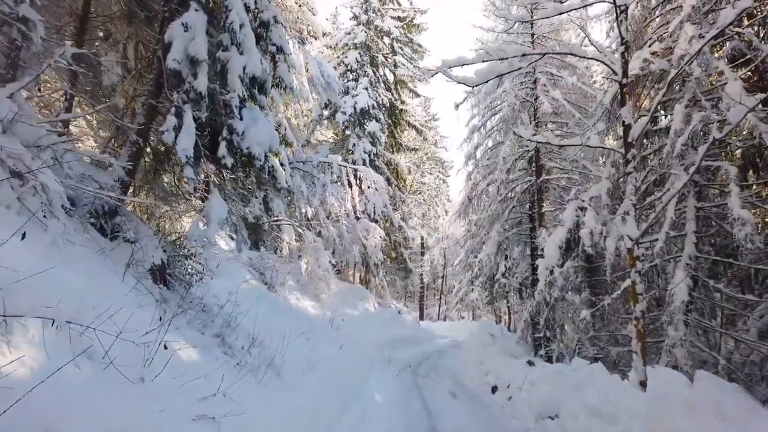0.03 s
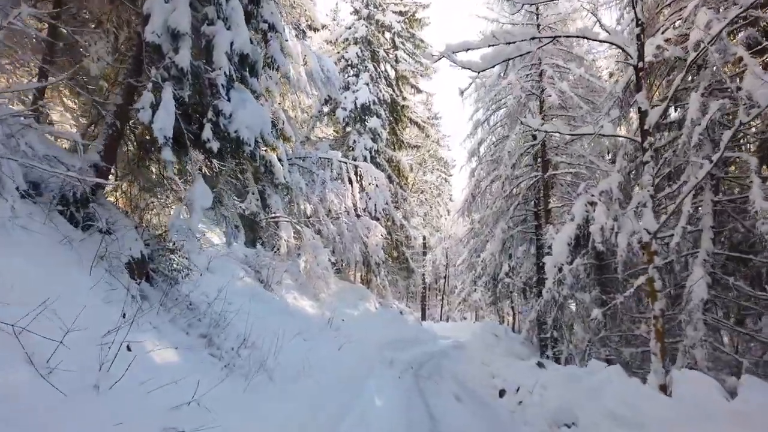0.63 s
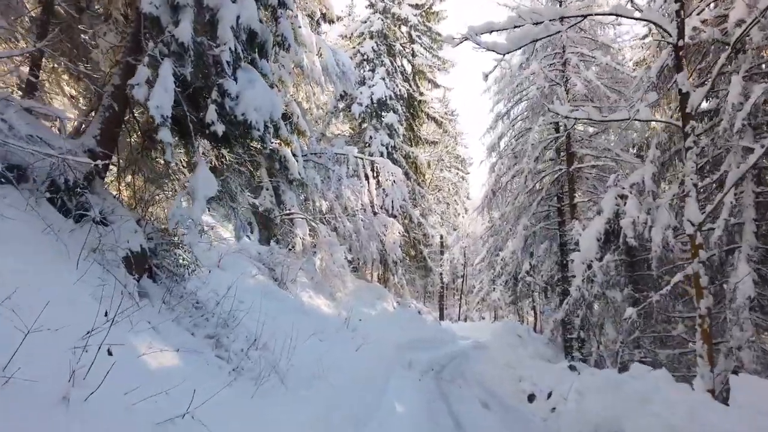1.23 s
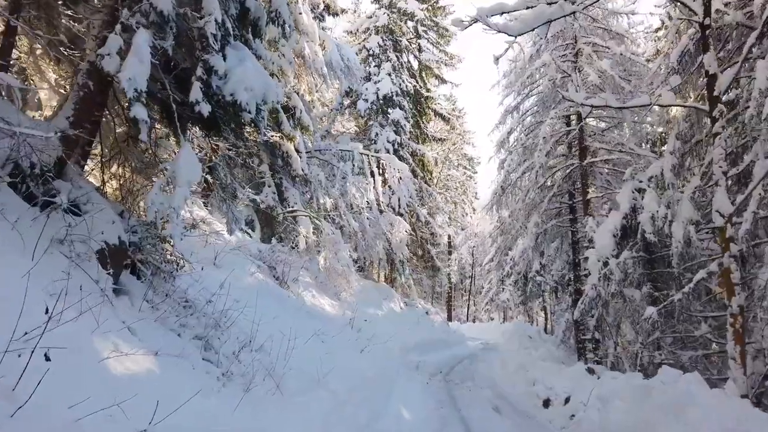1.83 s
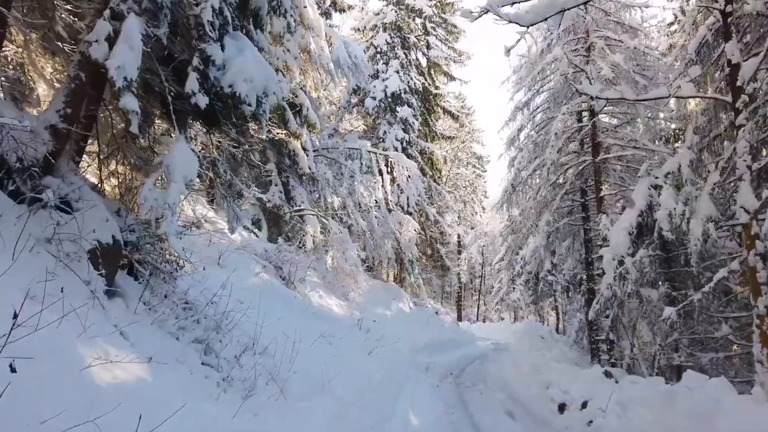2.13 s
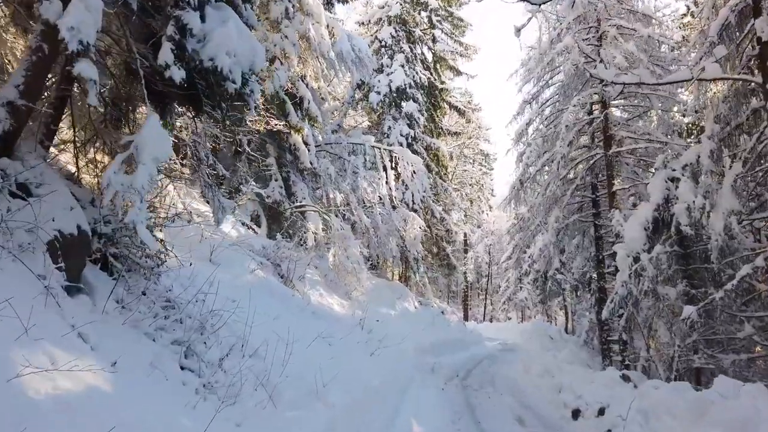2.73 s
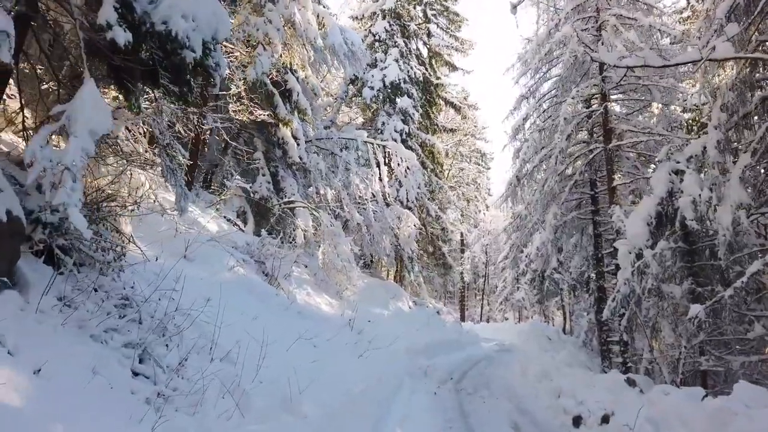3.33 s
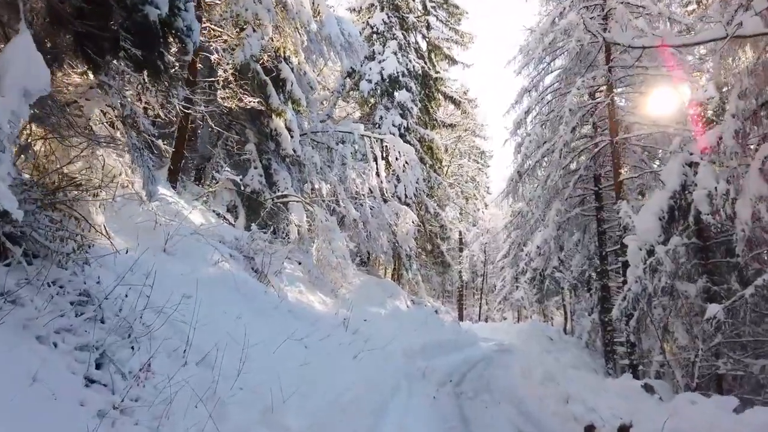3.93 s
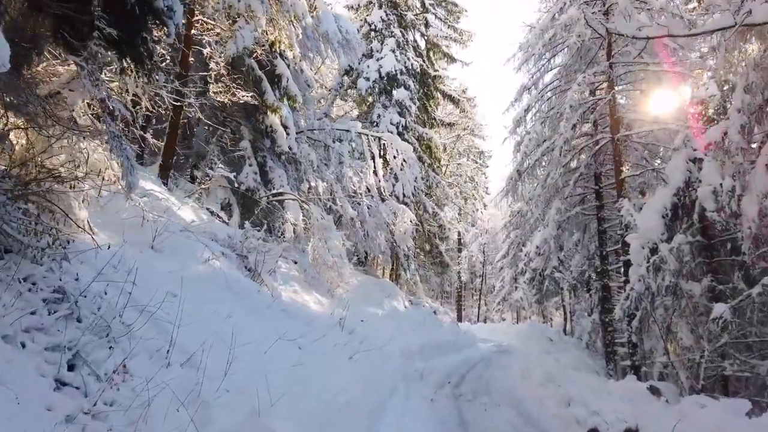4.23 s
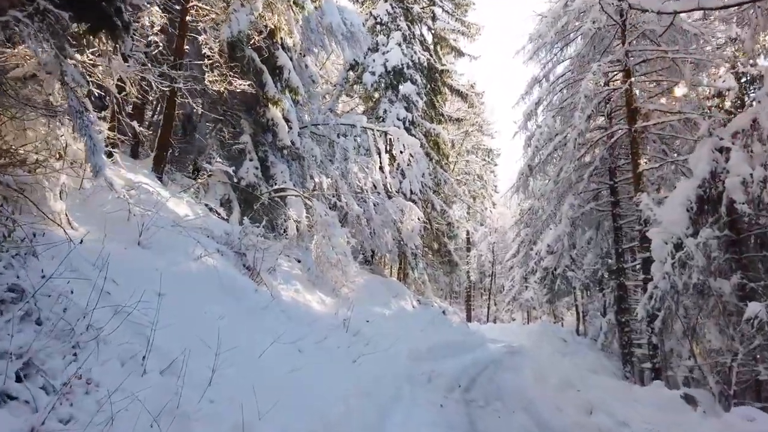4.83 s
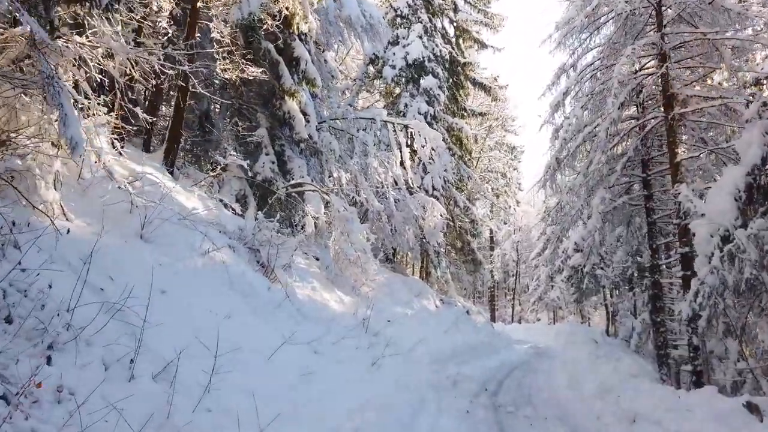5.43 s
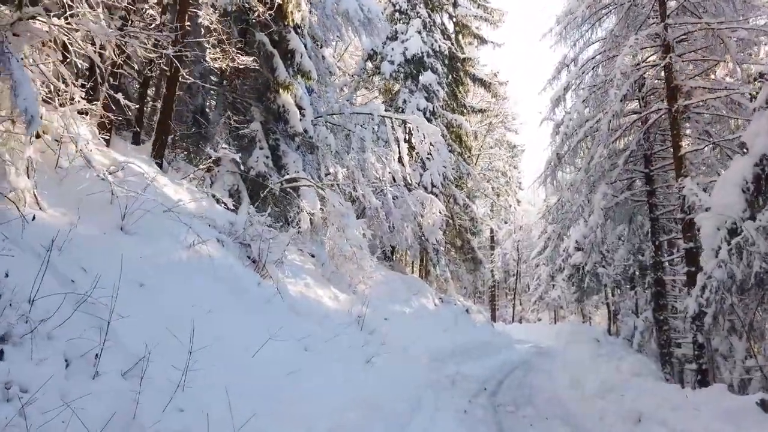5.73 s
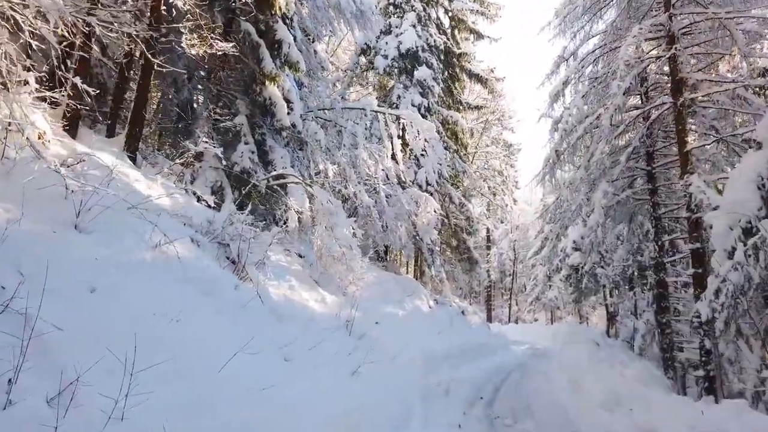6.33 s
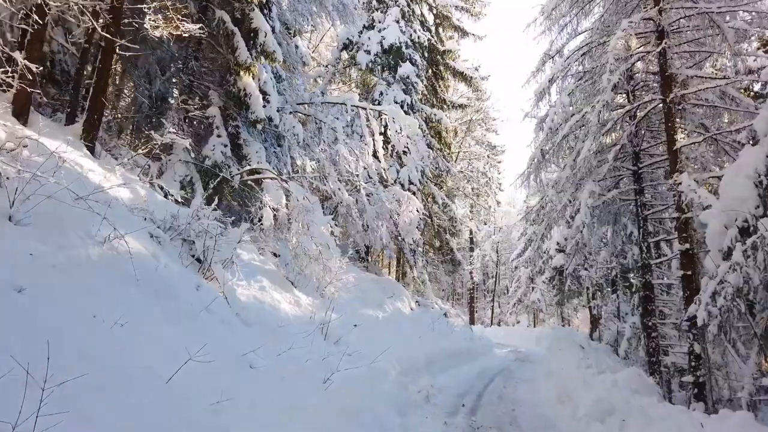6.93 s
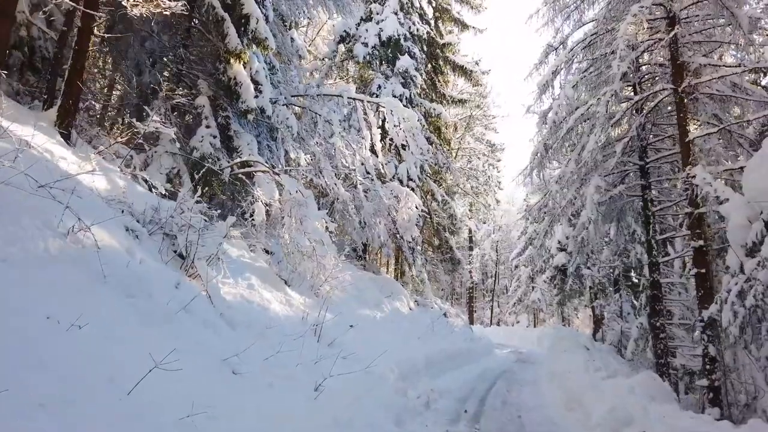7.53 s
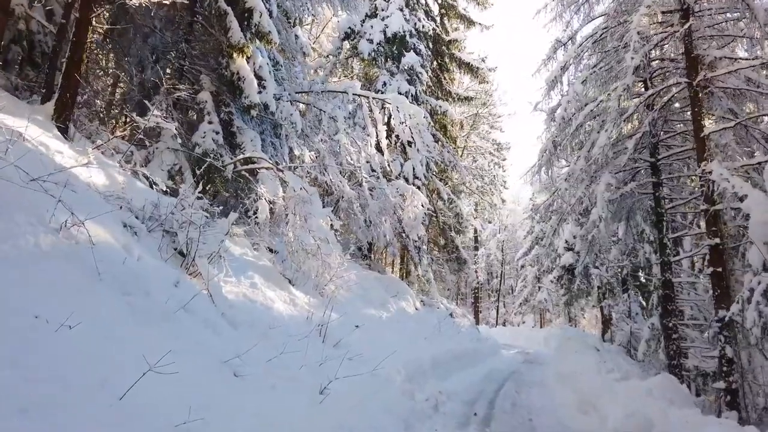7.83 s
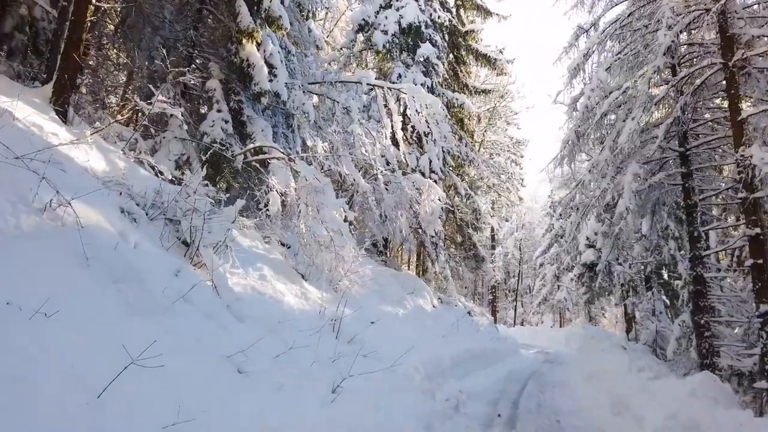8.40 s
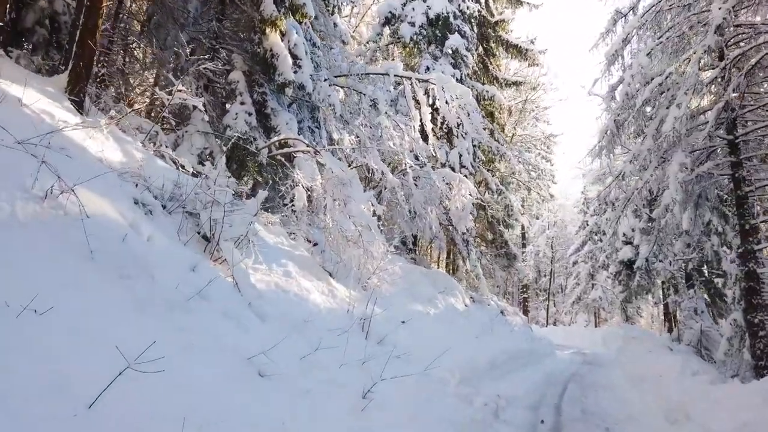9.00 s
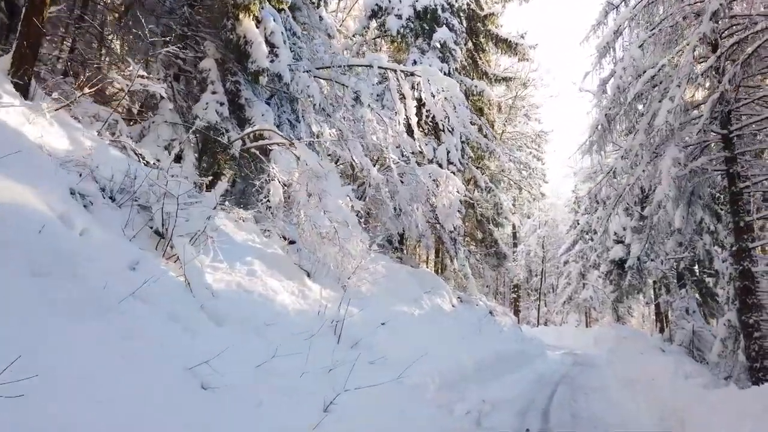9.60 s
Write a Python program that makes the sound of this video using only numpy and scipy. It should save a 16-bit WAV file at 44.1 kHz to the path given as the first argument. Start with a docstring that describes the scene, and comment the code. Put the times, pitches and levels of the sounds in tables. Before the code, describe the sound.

Close, dry footsteps crunch through snow at an unhurried, even pace, heard from a microphone in the walker's hand. They start softly, grow more crackly as the crust breaks, peak a little past halfway, then turn lighter. Powder hisses and packed snow creaks briefly underfoot, and a sleeve swishes once late on. Soft puffs of air and a thin sizzle of fingers touch the microphone over a faint forest hush.

```python
"""A snowy forest path, nearly silent. Someone walks it, phone in hand, about three steps in two seconds.
Under each boot the snow packs in a run of dull little fractures, cracks louder where the crust gives way
and creaks where it shears. Loose powder hisses and a nylon sleeve brushes once.
Fingers rubbing the phone make its microphone ports sizzle, and air buffets them."""
import sys
import numpy as np
from scipy import signal
from scipy.fft import rfft, irfft
from scipy.io import wavfile
from scipy.ndimage import uniform_filter1d

SR = 44100
rng = np.random.default_rng(int(sys.argv[2]) if len(sys.argv) > 2 else 0)


def int16_out(signal):
    """Quantize to a 16-bit WAV file."""
    q = np.round(np.clip(np.atleast_2d(signal).T, -1, 1) * 32767)
    wavfile.write(sys.argv[1], SR, q.astype(np.int16))


N = 426006
TIME = np.arange(N) / SR

# footfalls: (time [s], sink time [s], crunch [dB], packing [dB], hiss [dB], settling [dB], air jolt [dB])
STEPS = [(0.53, .13, -48, -58, -63.5, -60, -47.5), (1.145, 0.14, -47, -66, -62, -69, -71),
         (1.852, 0.15, -46.5, -64, -57, -61.5, -47.5), (2.45, 0.15, -44, -52.5, -57, -66.5, -60),
         (3.116, 0.11, -41, -51, -56, -60.5, -54), (3.725, .12, -43, -51.5, -53.5, -66, -42),
         (4.39, .13, -43, -44, -54, -52.5, -48.5), (5.06, .16, -49.5, -63, -53.5, -66.5, -53.5),
         (5.718, 0.11, -42, -47.5, -53.5, -56, -51), (6.222, .23, -47, -55, -59.5, -69, -46.5),
         (7.035, .10, -46, -61, -55.5, -64.5, -52.5), (7.688, .08, -49.5, -50, -51.5, -60.5, -68.5),
         (8.318, .13, -50.5, -53, -62, -64.5, -49), (8.865, .075, -42, -53, -55.5, -62.5, -67),
         (9.62, 0.15, -46, -49.5, -53.5, -61.5, -46.5)]


def gait(blend_s=0.18, settle_deep_db=-9, trickle_db=-73, breeze_db=-63.5):
    """Levels [dB] of crunch, deep packing, powder hiss and buffeting along the walk."""
    # footfall envelopes: (20 dB attack [s], sag [dB/s], mid-sink swell [dB], 20 dB release [s])
    crunch_shape = (0.036, 21.4, 1.7, 0.07)
    packing_shape = (0.043, 21, 0.68, 0.1)
    hiss_shape = (0.0665, -9, 3.5, 0.1238)
    jolt_shape = (0.35, 0, 7, 0.34)
    # boot drags or rolls off: (centre [s], length [s], crunch [dB], packing [dB], hiss [dB])
    scuffs = [(0.013, .07, -68, -82, -64.5), (0.215, .1, -72, -78, -69), (0.382, .05, -69, -50.5, -81),
              (0.861, .12, -62, -71.5, -68), (1.298, 0.078, -64, -83, -54.5),
              (1.716, 0.041, -76, -70, -77.5), (3.305, 0.16, -55.5, -62, -73),
              (3.68, 0.1289, -55, -68, -59.5), (4.208, 0.11, -57, -53, -92),
              (4.304, 0.06, -46.5, -42.5, -57), (4.399, .05, -50, -42, -67), (5.019, 0.2, -58, -78, -59.5),
              (5.631, 0.11, -55, -53, -60), (6.481, 0.0501, -54, -62, -57), (7.027, .03, -56, -48, -56.5),
              (7.333, 0.056, -65, -53, -71), (7.944, 0.075, -58, -51, -67), (8.44, .09, -56, -66, -56.5),
              (8.81, .12, -54, -76, -66), (9.083, 0.28, -51.5, -57.5, -61.5)]
    # air over the ports: (centre [s], length [s], level [dB])
    gusts = [(0.0, 0.091, -45), (1.72, 0.12, -39), (2.78, 0.074, -46.5), (3.28, 0.048, -48),
             (4.11, 0.13, -46), (6.1, 0.24, -40.5), (7.51, 0.12, -44.5), (7.97, .06, -45),
             (8.54, 0.16, -45.5), (8.69, 0.064, -41), (9.07, 0.15, -46.5), (9.27, .1, -47.5)]
    step_s, _, crunch_db, packing_db, hiss_db, settle_db, jolt_db = np.transpose(STEPS)
    standing = np.searchsorted(step_s, TIME) - 1  # this foot packs the snow until the next lands
    standing_db = np.where(standing < 0, np.median(settle_db), settle_db[standing])
    settling = undb(uniform_filter1d(standing_db, int(blend_s * SR)) + 0.96 * wander(18))
    trickle = undb(trickle_db + 2.0 * wander(6))
    breeze = undb(breeze_db + 2.5 * wander(5.3))
    scuff_crunch, scuff_packing, scuff_hiss = (swells(np.array(scuffs)[:, [0, 1, k]]) for k in (2, 3, 4))
    return (sum_db(footfalls(crunch_db, crunch_shape), scuff_crunch, settling),
            sum_db(footfalls(packing_db, packing_shape), scuff_packing, settling * undb(settle_deep_db)),
            sum_db(footfalls(hiss_db, hiss_shape), scuff_hiss, trickle),
            sum_db(footfalls(jolt_db, jolt_shape), swells(gusts), breeze))


def footfalls(levels_db, shape):
    """Gain of all steps: the boot bites, presses as it sinks, comes to rest."""
    attack_s, sag_db_per_s, swell_db, release_s = shape
    out = np.zeros(N)
    for (at_s, sink_s, *_), db in zip(STEPS, levels_db):
        span = between(at_s - 2 * attack_s, at_s + sink_s + 2 * release_s)
        t = TIME[span] - at_s
        depth = np.clip(t / sink_s, 0, 1)
        fade = np.maximum(-t / attack_s, 0) + np.maximum((t - sink_s) / release_s, 0)
        press_db = swell_db * (np.sin(np.pi * depth) - 2 / np.pi) - sag_db_per_s * sink_s * depth
        out[span] += undb(db + press_db - 20 * fade)
    return out


def crunch(crunch_db, packing_db, grain_q=2.35, lump_db=2.0):
    """Snow packs in jerks, each clump at its own pitch; a harder push makes more of them."""
    # top snow and deeper layers: (frequency [Hz], density [dB])
    top_spectrum = [(120, -17), (300, -3.5), (500, 1.5), (780, 1), (1100, 0), (1600, -6), (2500, -10),
                    (4000, -9.5), (8000, -38.5)]
    deep_spectrum = [(50, -11.5), (110, 3.5), (200, 3.5), (330, 3), (550, -25.5), (1200, -57.5)]
    slips_per_s = 220 * undb(0.14 * (crunch_db + 50.5))
    clumps = sum(unit(band(slips(slips_per_s, scatter_db=4.0), hz, grain_q)) * np.sqrt(hz)
                 for hz in np.geomspace(280, 3000, 8))
    load = np.clip((crunch_db + 81) / 20, .2, 1)
    lumps = undb(lump_db * load * wander(130))  # a loaded sole sinks unevenly
    top = even_out(colour(clumps * lumps, top_spectrum), span_s=0.15)
    deep = even_out(colour(slips(3 * slips_per_s, scatter_db=8.0), deep_spectrum), span_s=0.13)
    return top * undb(crunch_db) + deep * undb(packing_db)


def crust(crunch_db, snap_hz=1700, whump_hz=200, delay_s=0.002583, sink_s=0.0023,
          before_db=-10, before_s=0.0028, after_s=0.0045):
    """Crust breaks: a dull thud, a snap above, a whump below; a few crumbs before, more after."""
    # single fractures: (time [s], peak [dB], pitch [Hz], snap re thud [dB])
    loud_cracks = [(0.391, -36.5, 433, -27), (0.621, -29, 758, -18), (0.667, -37.5, 488, -18),
                   (1.14, -36, 504, -4), (1.394, -39.5, 501, -23.5), (1.561, -43, 391, -16),
                   (1.847, -37, 463.4, -25), (2.165, -44, 406, -23.5), (2.446, -24.5, 539, -9),
                   (2.475, -30.5, 876, -12), (2.516, -24, 920, -12), (2.535, -35, 600, -20),
                   (3.005, -32, 684, -6), (3.115, -28, 552.6, -24.5), (3.17, -24.5, 739, -13.5),
                   (3.189, -21.5, 595.4, -1), (3.26, -29.5, 895, -27), (3.301, -31.5, 885, -27),
                   (3.372, -30, 891, -2), (3.382, -32.5, 824, -3.5), (3.507, -31.5, 934, -25.5),
                   (3.588, -27, 1110, -1), (3.626, -32.5, 930, -22), (4.02, -37.5, 771, -21),
                   (4.153, -41.5, 519, -12.5), (4.289, -20, 732, 1.5), (4.31, -27, 431, -25),
                   (4.378, -27.5, 416, -2), (4.411, -26.5, 470, -21), (4.459, -18, 779, -30),
                   (4.486, -21.5, 890, -29.5), (4.525, -19, 738, -20), (4.558, -19, 889, -34),
                   (4.639, -17, 840, -24.5), (4.735, -28.5, 570, -20.5), (4.773, -34, 662, -13.5),
                   (4.822, -30.5, 803, -23), (4.874, -24, 1050, -8), (4.933, -28, 642, -18),
                   (4.942, -27.5, 950, -19), (5.088, -31, 592, -4), (5.146, -28, 693, -1.5),
                   (5.241, -30.5, 548, 2), (5.466, -40, 1000, -14), (5.596, -31.5, 684, -8),
                   (5.629, -29.5, 506, -4), (5.725, -18.5, 618, -9), (5.749, -22.5, 750, -16),
                   (5.771, -15, 752, -10), (5.817, -11.5, 1000, -16), (5.958, -28.5, 575, -6),
                   (6.22, -5.5, 773, -18.5), (6.254, -14, 780, -18), (6.338, -10.5, 880, -7.5),
                   (6.393, -26.5, 870, -11.5), (6.432, -29, 823, -27), (6.499, -34.5, 420, -11.5),
                   (7.027, -31, 607, -8), (7.058, -20.5, 870, -2), (7.07, -26.5, 910, -15),
                   (7.157, -25.5, 1024, -9), (7.329, -40.5, 417, -3.5), (7.453, -32.5, 1747, -19.5),
                   (7.708, -21, 863, -8), (7.734, -27.5, 843, -23.5), (7.78, -32, 625, -22),
                   (7.925, -39, 380, -6), (8.278, -26.5, 420, 2.5), (8.379, -30.5, 859, -17),
                   (8.711, -37, 633, 5), (9.166, -31.5, 800, -28.5), (9.179, -33.5, 690, -28),
                   (9.541, -36, 401, -7), (9.617, -30.5, 402, -20)]
    cracks = list(loud_cracks) + small_cracks(crunch_db)
    lead = SR // 100
    out = np.zeros(N + SR)
    t = np.arange(-lead, SR // 25) / SR
    draws = rng.standard_normal((len(cracks), len(t)))
    loosening = np.where(t < 0, undb(before_db) * np.exp(t / before_s), np.exp(-t / after_s))
    for (at_s, db, hz, snap_db), draw in zip(cracks, draws):
        crumble_db = -9.5 - 0.27 * max(db + 30, -10)  # louder cracks break more cleanly
        whump_db = -20.5 - 16.5 * np.log2(hz / 700)  # lower cracks reach deeper
        snap = thud(t - delay_s, snap_hz * np.exp(0.17 * draw[0]), cycles=1.12)
        pulse = thud(t - delay_s, hz, cycles=1.17) + undb(snap_db) * snap
        whump = thud(t - delay_s - sink_s, whump_hz, cycles=1.54)  # the layer beneath sinks later
        pieces = draw * (np.abs(draw) > 2)  # only a few let go
        crumbs = pieces * loosening * np.minimum(np.abs(t) * hz / 2, 1)
        crumble = signal.fftconvolve(pulse, crumbs)[lead:lead + len(t)]
        start = int(at_s * SR)
        for part, relative_db in (pulse, 0), (whump, whump_db), (crumble, crumble_db):
            out[start:start + len(t)] += undb(db + relative_db) * part / np.abs(part).max()
    return out[lead:lead + N]


def small_cracks(crunch_db, count=70, above_crunch_db=10, scatter_db=2, median_hz=650, snap_db=-13.5):
    """Rows for crust(): weak random fractures, denser and stronger under load."""
    load = np.cumsum(undb(crunch_db))
    at = np.searchsorted(load, (np.arange(count) + rng.random(count)) * load[-1] / count)
    size, pitch = rng.standard_normal((count, 2)).T
    peak_db = crunch_db[at] + above_crunch_db + scatter_db * size
    pitch_hz = median_hz * np.exp(0.21 * pitch)
    return list(zip(at / SR, peak_db, pitch_hz, np.full(count, snap_db)))


def creaks(slip_hz=330, jitter=0.34, ring_q=2.16):
    """Cold snow sticks and slips in a quick, uneven run that rings the packed layer."""
    # shearing under the sole: (centre [s], length [s], level [dB], pitch [Hz])
    shears = [(0.37, 0.068, -52, 640), (0.544, 0.032, -48.5, 810), (0.639, 0.023, -44, 801),
              (1.175, 0.031, -58, 940), (2.575, 0.026, -44, 636), (2.984, 0.04, -56, 890),
              (6.02, 0.15, -53.5, 881), (6.783, 0.027, -50.5, 755), (7.066, 0.04, -39, 892),
              (7.689, 0.036, -43, 727), (7.968, 0.043, -51.5, 434), (9.143, 0.023, -47.5, 636),
              (9.654, 0.027, -37, 570)]
    out = np.zeros(N)
    t = np.arange(-SR // 10, SR // 10) / SR
    for at_s, length_s, db, hz in shears:
        slip_s = t[0] + np.cumsum(np.exp(jitter * rng.standard_normal(150))) / slip_hz
        pulses = np.histogram(slip_s, len(t), (t[0], t[-1]))[0]
        ring = unit(band(band(pulses, hz, ring_q), hz, ring_q / 2))
        envelope = undb(db) * np.exp(-(2 * t / length_s) ** 2)
        out += np.interp(TIME, at_s + t, ring * envelope, left=0, right=0)
    return out


def leg_echoes(x, echo_db=-15, decay_s=0.0083):
    """Legs and coat return soft echoes within milliseconds, different at each port."""
    t = np.arange(SR // 20) / SR
    echoes = rng.standard_normal((2, len(t))) * np.exp(-t / decay_s) * (t > .003)
    echoes /= np.linalg.norm(echoes, axis=1, keepdims=True)
    return undb(echo_db) * signal.fftconvolve(x[None], echoes)[:, :N]


def powder(hiss_db, flicker_db=1.0, direct_db=1.5, scattered_db=2.5):
    """Fine crystals rub on boot and trouser leg; the hiss arrives direct and scattered."""
    # powder friction: (frequency [Hz], density [dB])
    spectrum = [(500, 8.5), (1500, 9.5), (2600, 6), (4000, 2), (6000, 0), (8500, -3), (11000, -1.5),
                (13000, -2), (16000, -9.5)]
    grains = from_below(colour(slips(3000, scatter_db=3.0), spectrum))
    hiss = undb(direct_db) * grains + undb(scattered_db) * noise(spectrum, spread=0.74)
    return hiss * undb(hiss_db + flicker_db * wander(90))


def port_sizzle(hiss_db, re_hiss_db=-7.5, grain_db=2.0):
    """Fingers rub the phone and ring its ports at 10-11 kHz: uneven bursts, and a little each step."""
    # finger rubs: (centre [s], length [s], level [dB])
    rubs = [(1.48, 0.026, -63.5), (2.475, 0.028, -52), (3.17, 0.059, -57), (3.75, 0.11, -51.5),
            (4.46, 0.074, -57.5), (4.643, 0.03, -60), (5.15, .12, -62), (5.56, 0.033, -62.5),
            (5.645, 0.027, -60), (6.342, 0.0029, -42.5), (7.456, 0.0046, -51.5), (7.47, 0.075, -60.5),
            (8.78, 0.011, -56), (8.82, 0.083, -55), (8.91, 0.067, -48.5)]
    # rubbed port resonance: (frequency [Hz], density [dB])
    spectrum = [(4000, -29), (8000, -5), (9400, -3), (10300, 0), (11200, -1.5), (12500, -16),
                (16000, -18.5)]
    envelope = swells(rubs) + undb(hiss_db + re_hiss_db)
    return envelope * noise(spectrum, spread=1.0) * undb(grain_db * wander(300))


def sleeve():
    """A nylon sleeve brushes the jacket in one smooth swell."""
    # arm swing: (centre [s], length [s], level [dB])
    swishes = [(8.121, .15, -50)]
    # nylon friction: (frequency [Hz], density [dB])
    spectrum = [(300, -24), (1500, 5), (2500, 10), (4000, 5), (7000, 0.5), (11000, -2), (16000, -1)]
    return swells(swishes) * noise(spectrum, spread=0.74)


def wind(buffet_db, eddy_db=-4.0):
    """Air buffets both ports alike; the slowest eddies differ between them."""
    # buffeting and eddies: (frequency [Hz], density [dB])
    buffet_spectrum = [(10, -9), (30, 0.5), (55, -5), (90, -13), (160, -35), (400, -68), (1500, -58)]
    eddy_spectrum = [(10, -6), (30, -6), (55, -8.5), (90, -31), (160, -45), (600, -53)]
    buffet = even_out(colour(rng.standard_normal(N), buffet_spectrum), span_s=0.104)
    eddies = colour(rng.standard_normal(N), eddy_spectrum) * np.array([[1], [-1]])
    return (buffet + undb(eddy_db) * eddies) * undb(buffet_db)


def forest(level_db=-62.5):
    """Faint, steady hush."""
    # forest background: (frequency [Hz], density [dB])
    spectrum = [(30, 9.5), (100, 6.5), (250, 2.5), (500, -2.5), (850, -4), (1500, -8), (2500, -6),
                (4500, -16.5), (9000, -18), (16000, -58)]
    return noise(spectrum, spread=0.023) * undb(level_db)


def slips(per_s, scatter_db):
    """Random tiny collapses of either sign, most weak, a few strong."""
    happens = rng.random(N) < per_s / SR
    size = undb(scatter_db * np.minimum(rng.exponential(size=N), 3.5))
    return happens * size * rng.choice([-1, 1], N)


def thud(t, hz, cycles):
    """Push and rebound of air, centred on t = 0; rms 1."""
    bell = np.exp(-(2 * t * hz / cycles) ** 2)
    wave = -np.cos(2 * np.pi * t * hz + np.pi / 5)
    return unit(bell * (wave - np.average(wave, weights=bell)))


def from_below(x, lag_s=0.00012):
    """Sound from the ground reaches the left port later."""
    hz = np.fft.rfftfreq(N, 1 / SR)
    left = irfft(rfft(x) * np.exp(-2j * np.pi * hz * lag_s), N)
    return np.array([left, x])


def band(x, hz, q):
    """One damped resonance."""
    return signal.lfilter(*signal.iirpeak(hz, q, fs=SR), x)


def colour(x, spectrum, size=8192):
    """Minimum-phase filter via the cepstrum; output rms 1."""
    hz, db = np.transpose(spectrum)
    bins_hz = np.maximum(np.fft.rfftfreq(size, 1 / SR), 1)
    gain = undb(np.interp(np.log(bins_hz), np.log(hz), db))
    cepstrum = irfft(np.log(gain))
    cepstrum[1:size // 2] *= 2
    cepstrum[size // 2 + 1:] = 0
    response = irfft(np.exp(rfft(cepstrum)))[:size // 2]
    return unit(signal.fftconvolve(x, response)[:N])


def noise(spectrum, spread):
    """Coloured stereo noise; spread = side / mid amplitude."""
    mid, side = (colour(rng.standard_normal(N), spectrum) for _ in range(2))
    return unit(np.array([mid + spread * side, mid - spread * side]))


def wander(per_s):
    """Slewed random values; rms 1."""
    hold = int(SR / per_s)
    held = rng.standard_normal(N)[np.arange(N) // hold]
    return unit(uniform_filter1d(held, hold))


def swells(rows):
    """Gain of Gaussian swells: (centre [s], length [s], level [dB])."""
    out = np.zeros(N)
    for at_s, length_s, db in rows:
        span = between(at_s - 2 * length_s, at_s + 2 * length_s)
        out[span] += undb(db) * np.exp(-(2 * (TIME[span] - at_s) / length_s) ** 2)
    return out


def even_out(x, span_s):
    """Steady the mean power, keep the fine grain."""
    return x / np.sqrt(uniform_filter1d(x ** 2, int(span_s * SR)) + 0.0078)


def between(start_s, end_s):
    """Sample slice of a time span."""
    return slice(*np.searchsorted(TIME, [start_s, end_s]))


def sum_db(*gains):
    """Power sum of unrelated sounds [dB]."""
    return 10 * np.log10(sum(g ** 2 for g in gains) + 1e-14)


def undb(db):
    """Decibels to gain."""
    return 10 ** (np.asarray(db) / 20)


def unit(x):
    """Scale to rms 1."""
    return x / np.sqrt(np.mean(x ** 2))


def scene():
    """Boots, fingers, clothing and air; the snowy forest itself gives no echo."""
    crunch_db, packing_db, hiss_db, buffet_db = gait()
    boots = crunch(crunch_db, packing_db) + crust(crunch_db) + creaks()
    balance = undb([[.25], [-.25]])
    steps = from_below(boots) * balance + leg_echoes(boots)
    return steps + powder(hiss_db) + port_sizzle(hiss_db) + sleeve() + wind(buffet_db) + forest()


def record(dry, port_hz=10350, port_q=11.5, port_db=-2.0, hiss_db=-73, cutoff_hz=15850):
    """The ports ring in the high treble; the phone adds faint hiss and cuts the top."""
    ring = band(dry, port_hz, port_q)
    hiss = undb(hiss_db) * rng.standard_normal(dry.shape)
    low_pass = signal.ellip(10, .2, 80, cutoff_hz, fs=SR, output="sos")
    return signal.sosfilt(low_pass, dry + undb(port_db) * ring + hiss)


dry = scene()
out = record(dry)
int16_out(out)
```